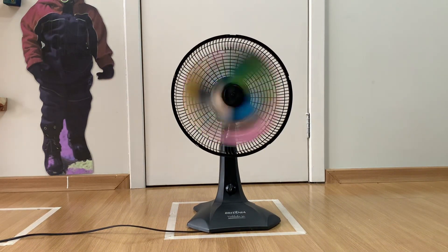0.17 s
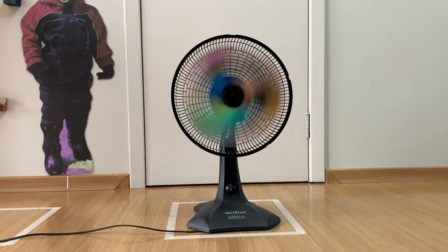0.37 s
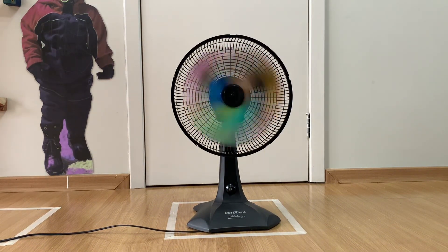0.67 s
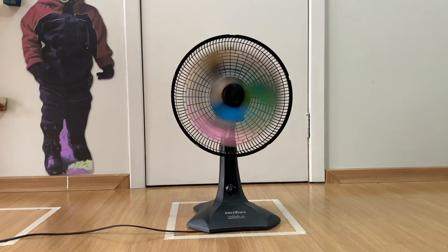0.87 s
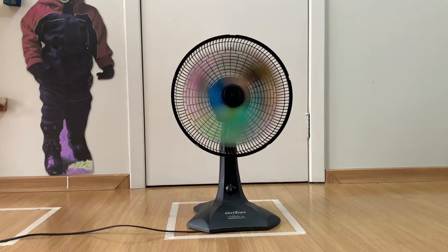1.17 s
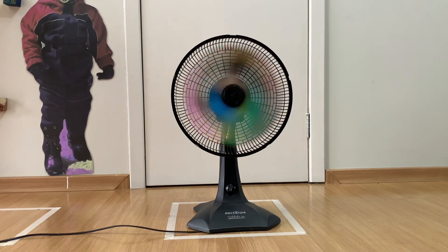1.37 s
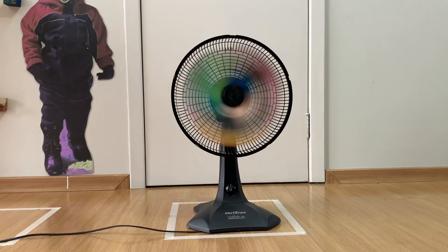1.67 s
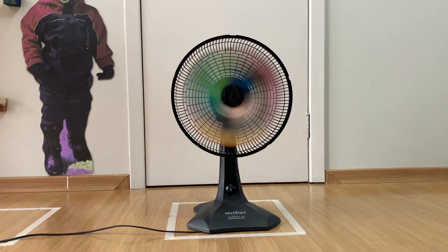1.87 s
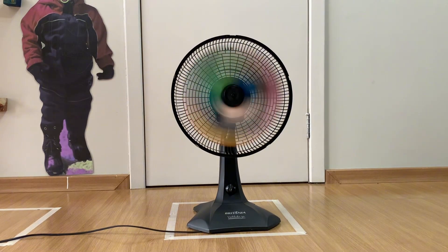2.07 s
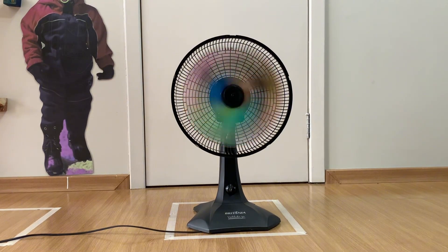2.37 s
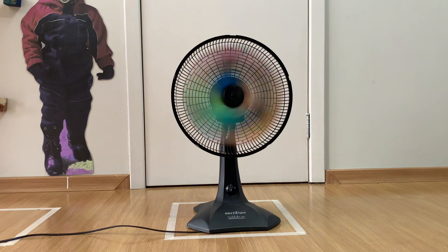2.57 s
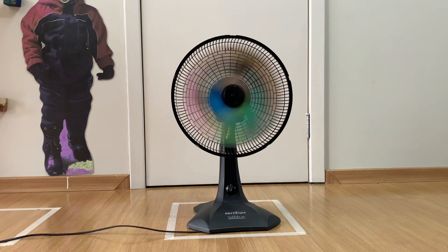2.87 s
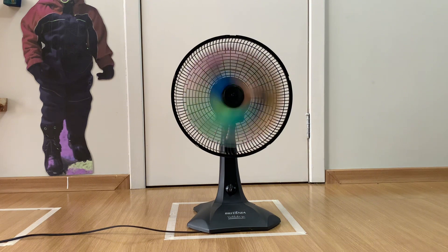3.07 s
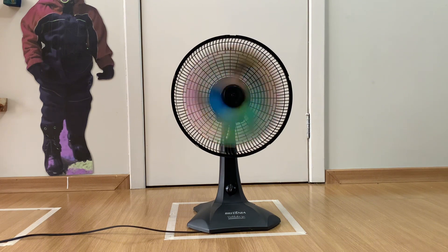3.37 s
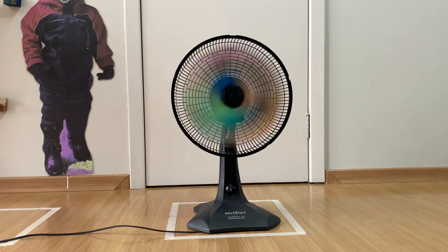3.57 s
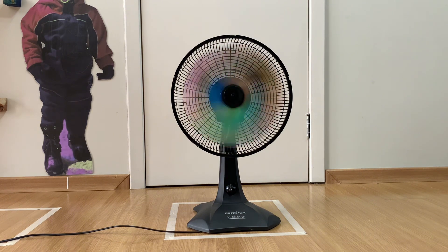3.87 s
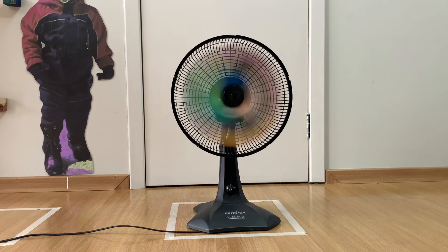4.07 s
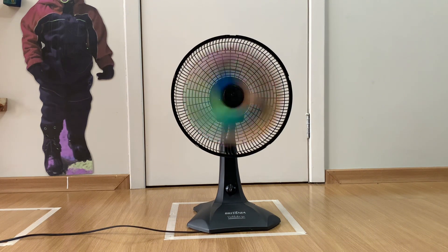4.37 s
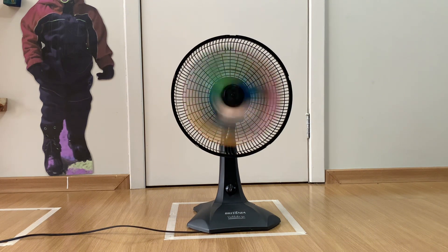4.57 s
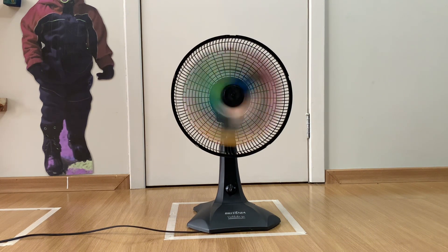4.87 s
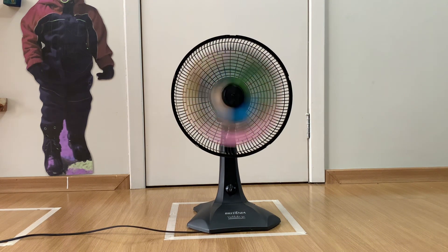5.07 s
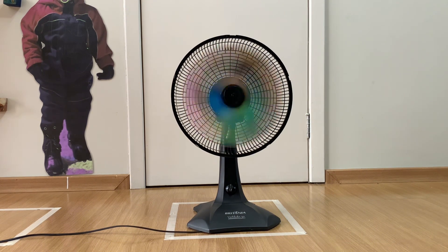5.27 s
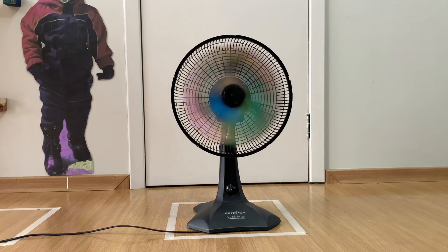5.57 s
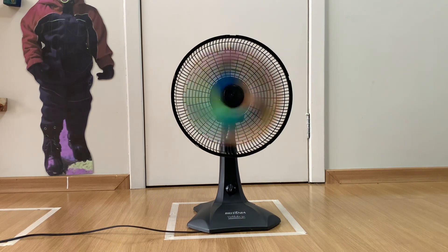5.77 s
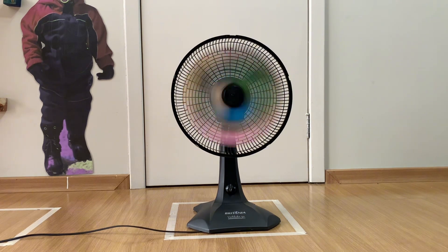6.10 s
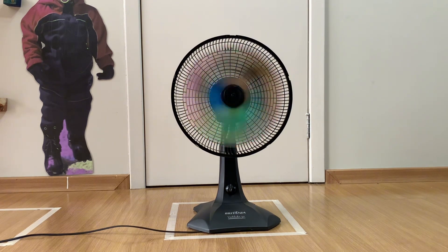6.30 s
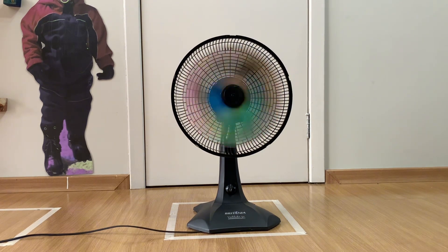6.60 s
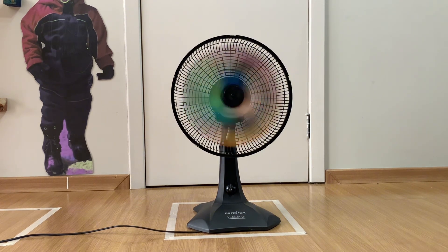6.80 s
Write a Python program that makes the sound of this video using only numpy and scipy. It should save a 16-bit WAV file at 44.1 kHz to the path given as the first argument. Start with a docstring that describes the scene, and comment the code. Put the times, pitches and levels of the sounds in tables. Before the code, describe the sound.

A desk fan whirs softly in a bare room, its draught buffeting the microphone with uneven low rumbling gusts and flapping thumps.

```python
"""Desk fan and draught in a bare room

A soft, slowly swelling rush of air through the grille is noise with a shaped spectrum, above a faint hum.
After a second the draught buffets the microphone: a low rumble of band-limited turbulence comes in gusts,
and single eddies, tones of falling pitch, flap across the ports and break up into rough flurries.
The quickest eddies tear with short rasps of noise; a steady room tone lies beneath."""
import sys
import numpy as np
from scipy import signal
from scipy.fft import rfft, irfft
from scipy.io import wavfile
from scipy.ndimage import uniform_filter1d, minimum_filter1d

SR = 44100
rng = np.random.default_rng(int(sys.argv[2]) if len(sys.argv) > 2 else 0)


def bounce(signal):
    """Save signal as a 16-bit WAV file at the path given by the first command-line argument."""
    frames = np.transpose(np.atleast_2d(signal))
    limited = np.clip(frames, -1, 1)
    pcm = np.round(limited * 32767).astype(np.int16)
    wavfile.write(sys.argv[1], SR, pcm)


N = 306054
TIME = np.arange(N) / SR

# relative strength of the plain draught on the microphone: t/s, level/dB
DRAUGHT_CURVE = [(0, -54.5), (.85, -48.5), (.94, -47), (1.01, -31), (1.65, -29), (2.3, -24), (3.4, -25),
                 (4.2, -26.5), (4.8, -23), (5.4, -24.5), (5.6, -32), (5.85, -29), (6.37, -25), (6.45, -30),
                 (6.62, -29), (6.92, -26)]
# strong eddies that hit the ports: t/s, relative ripple level/dB, pitch f/Hz, relative swing level/dB
STRONG_EDDIES = [(1.003, -27.5, 218.6, -41), (1.044, -33, 200.6, -15), (1.193, -30, 270.8, -18.5),
                 (1.225, -27, 281, -28), (1.383, -24.5, 235.5, -22), (1.453, -35, 234.3, -15.5),
                 (1.84, -32, 212, -19), (2.003, -23.5, 252.9, -14), (2.025, -23.5, 262, -29),
                 (2.208, -39, 194.3, -14.5), (2.292, -23, 289, -37), (2.311, -16.5, 350, -19),
                 (2.321, -15.5, 281.3, -14.5), (2.513, -23.5, 251.4, -19), (2.54, -33, 378.6, -26.5),
                 (2.602, -22, 330.6, -8.5), (2.665, -26, 252, -16.5), (2.778, -21, 300.4, -28.5),
                 (2.792, -21, 215.2, -7), (2.82, -18.5, 280, -15), (2.898, -19.5, 249, -25),
                 (3.094, -26.5, 367.6, -24), (3.204, -26, 255, -13), (3.267, -13.5, 272, -28),
                 (3.493, -17, 264, -14.5), (3.529, -22.5, 258.6, -20), (3.691, -21, 258, -18),
                 (3.847, -14, 275, -31.5), (3.854, -8.5, 487.4, -9), (3.893, -14, 294.3, -8),
                 (3.988, -21, 264.2, -14), (4.254, -20.5, 351.6, -13), (4.285, -23, 319, -22),
                 (4.331, -21, 262.8, -20), (4.39, -15, 237.6, -19), (4.598, -17, 289.4, -30),
                 (4.617, -20.5, 274, -16.5), (4.678, -12.5, 336.3, -7.5), (4.689, -11, 270.4, -15),
                 (4.705, -8.5, 224.6, -14.5), (4.727, -20, 278, -27), (4.996, -17.5, 279.3, -17.5),
                 (5.194, -13, 353, -14.5), (5.225, -18.5, 259, -17), (5.28, -11.5, 271.4, -14.5),
                 (5.34, -12.5, 328.8, -11.5), (5.711, -27, 258, -6.5), (5.807, -31, 281.2, -15.5),
                 (5.914, -22.5, 248.9, -12), (6.055, -21, 230.4, -5), (6.073, -16, 264.5, -20),
                 (6.085, -12.5, 264, -15.5), (6.173, -20, 261.6, -14.5), (6.223, -17.5, 276.5, -14.5),
                 (6.268, -13, 378.5, -11.5), (6.288, -5, 310.8, -6.5), (6.311, -17.5, 331.3, -13.5),
                 (6.331, -19, 285.6, -14.5), (6.386, -28.5, 330, -20.5), (6.564, -26, 238, -14.5),
                 (6.606, -16.5, 287.2, -12.5), (6.624, -14, 331, -12.5), (6.668, -15.5, 290, -23.5),
                 (6.68, -18.5, 259.6, -15), (6.735, -12.5, 298, -18.5), (6.754, -10.5, 250.3, -13),
                 (6.867, -11.5, 500.7, -18.5), (6.925, -20, 275, -9.5)]


def from_db(db):
    """Logarithmic level: decibels to amplitude gain."""
    return 10 ** (np.asarray(db) / 20)


def rms_one(x):
    """Normalisation by the root mean square, to an rms of 1."""
    return x / np.sqrt(np.mean(x ** 2) + 1e-20)


def in_time(rows):
    """Linear interpolation: each column of a curve at every sample."""
    s, *columns = np.transpose(rows)
    return [np.interp(TIME, s, column) for column in columns]


def butter(x, edges_hz, kind, order=2):
    """Causal Butterworth filter: maximally flat passband."""
    return signal.sosfilt(signal.butter(order, edges_hz, kind, fs=SR, output="sos"), x)


def coloured_noise(spectrum):
    """Spectral shaping: white noise is given a density in dB per Hz, interpolated over log frequency."""
    hz, level_db = np.transpose(spectrum)
    bins = np.maximum(np.fft.rfftfreq(N, 1 / SR), 1)
    gain = from_db(np.interp(np.log(bins), np.log(hz), level_db))
    return irfft(rfft(rng.standard_normal(N)) * gain, N) * np.sqrt(SR / 2)


def drift(rate):
    """Low-pass random process: chance of rms 1 that changes about rate times a second."""
    bins = np.fft.rfftfreq(N, 1 / SR)
    low_pass = 1 / (1 + (bins / rate) ** 2) ** 2
    return rms_one(irfft(rfft(rng.standard_normal(N)) * low_pass, N))


def wavering_tones(table):
    """Narrow-band noise: two random quadrature amplitudes make a line waver in strength and phase."""
    out = np.zeros(N)
    for hz, level_db, width_hz in table:
        phase = 2 * np.pi * hz * TIME
        line = drift(width_hz) * np.cos(phase) + drift(width_hz) * np.sin(phase)
        out += from_db(level_db) * line
    return out


def around(s):
    """Finite support: the samples computed for an eddy or tear at time s."""
    return slice(max(int((s - .03) * SR), 0), int((s + .07) * SR))


def fan(air_db=-83.5):
    """Broadband flow noise and grille whistles follow the rush; the hum of motor and blades is steady."""
    # colour of the rush, common to both channels (mid): f/Hz, relative density level/dB per Hz
    rush_mid = [(150, -0.5), (400, 2.5), (600, -3.5), (780, 1), (950, -4), (1090, -9), (1260, 2.5),
                (1550, -0.2), (1830, -2.4), (2040, -9.5), (3050, -10.5), (3500, -18), (5000, -22),
                (7000, -29), (9000, -47.5), (14000, -30)]
    # colour of the rush, opposed between the channels (side): f/Hz, relative density level/dB per Hz
    rush_side = [(150, -3.5), (450, -19), (720, -18), (890, -13), (1060, 2.5), (1350, -6.5), (1750, -8),
                 (2150, -15), (3000, -13), (3800, -23.5), (5200, -22), (7000, -28.5), (10000, -38),
                 (14000, -35)]
    # faint whistles of the grille: f/Hz, level relative to the rush gain/dB, width/Hz
    whistles = [(1288, -67, 12), (1723, -70, 11), (1789, -76, 25), (2602, -80, 22)]
    # hum of motor and blades, in mid before the flicker: f/Hz, level/dB, width/Hz
    hum_lines = [(69.8, -54.5, 13), (121.2, -54.5, 29), (193.6, -66, 61), (433, -75.5, 170)]
    air = from_db(air_db) * np.array([room(coloured_noise(rush_mid)), room(coloured_noise(rush_side))])
    grille = np.array([wavering_tones(whistles), wavering_tones(whistles) / 2])
    hum = np.array([wavering_tones(hum_lines), wavering_tones(hum_lines) / 2])
    return rush_strength() * (air + grille) + hum


def rush_strength(wander_db=0.6, dip_edge_s=0.025):
    """Amplitude modulation: the rush swells quickly, then settles and wavers, with two brief dips."""
    # gain of the rush before wander and dips: t/s, level/dB
    rush_curve = [(0, -15.5), (.6, -9.5), (1.05, -6.5), (2.05, -6), (2.7, -2.5), (3.9, 0.1), (5.2, .5),
                  (6.94, 1.9)]
    # brief dips that begin to recover: start t/s, end t/s, first depth/dB, last depth/dB
    rush_dips = [(4.638, 4.827, 6, 2), (5.178, 5.696, 5, 4)]
    level_db = in_time(rush_curve)[0] + wander_db * drift(6)
    for start, end, first_db, last_db in rush_dips:
        depth_db = np.interp(TIME, [start, end], [first_db, last_db])
        inside_s = np.minimum(TIME - start, end - TIME)
        level_db = level_db - depth_db * np.clip(.5 + inside_s / dip_edge_s, 0, 1)
    return from_db(level_db)


def room(x, count=24, reflection_db=-20, t60_s=.35):
    """Comb interference: echoes of bare floor, door and walls ripple the spectrum; the power is kept."""
    delays_s = rng.uniform(0.0029, .06, count)
    signs = rng.choice([-1, 1], count)
    gains = signs * from_db(reflection_db - 60 * delays_s / t60_s)
    echoes = sum(gain * np.roll(x, int(delay * SR)) for gain, delay in zip(gains, delays_s))
    return (x + echoes) / np.sqrt(1 + np.sum(gains ** 2))


def room_tone():
    """Stationary noise: room tone and hiss, independent in mid and side."""
    # spectrum of the room tone before the flicker: f/Hz, density level/dB per Hz
    tone_spectrum = [(25, -104), (100, -71), (280, -88), (420, -90), (700, -99), (1100, -91.5), (1500, -97),
                     (2200, -108), (5500, -109), (8000, -115), (11000, -114), (14000, -124)]
    return np.array([coloured_noise(tone_spectrum), coloured_noise(tone_spectrum)])


def flicker(x, spread_db=2.7):
    """Short-time spectral modulation: the sound flickers in small patches of time and frequency."""
    spectra = signal.stft(x, nperseg=1024)[2]
    patches = uniform_filter1d(rng.standard_normal(spectra.shape), size=3, axis=-2)  # along frequency
    patches = uniform_filter1d(patches, size=5, axis=-1)  # along time
    flickering = spectra * from_db(spread_db * rms_one(patches))
    return signal.istft(flickering, nperseg=1024)[1][..., :N]


def lull_depth(lull_s=0.035):
    """Smooth sech-squared pulses: how far the draught has sunk, in dB."""
    # lulls in the draught: t/s, depth/dB (negative where it rises)
    lulls = [(1.14, 2), (1.33, 0), (1.65, 2.5), (2.09, 9.5), (2.469, 6.5), (2.72, 2.5), (3.129, 4),
             (3.45, 5), (4.11, 3), (4.191, -0.5), (5.68, 0), (5.78, -5.5), (6.15, -0.5), (6.498, 3.5),
             (6.822, 6.5)]
    depth = np.zeros(N)
    for s, depth_db in lulls:
        distance = np.minimum(np.abs(TIME - s) / lull_s, 10)
        depth += depth_db / np.cosh(distance) ** 2
    return depth


def wind_levels(steepness=4.33):
    """Addition of powers: gusts add bells to the draught; deep dB, flutter dB, plain draught's share."""
    # gusts: t/s, length/s, relative deep rumble level/dB, relative flutter level/dB
    gusts = [(0.128, 0.057, -44, -39.5), (0.208, 0.039, -43, -44), (0.492, 0.031, -38, -60),
             (.61, .04, -43, -50), (1.075, 0.048, -22, -33), (1.231, 0.027, -20.5, -40),
             (1.483, 0.024, -16, -38), (1.562, 0.043, -14.5, -33), (1.74, 0.056, -15.5, -25.5),
             (1.847, 0.031, -17, -23), (2.003, 0.034, -17.5, -23.5), (2.148, 0.041, -22.5, -30),
             (2.515, 0.033, -21, -26), (2.625, 0.046, -17.5, -30), (2.805, 0.03, -7, -13.5),
             (2.959, 0.031, -16, -42), (3.211, 0.07, -19, -18.5), (3.547, 0.11, -20.5, -29.5),
             (3.734, 0.025, -21.5, -23.5), (3.807, 0.019, -19.5, -32), (3.925, 0.029, -18, -29),
             (4.012, 0.048, -12.5, -32.5), (4.568, 0.036, -13, -23), (4.647, 0.039, -13.5, -28),
             (4.699, 0.037, -11.5, -8.5), (4.786, .06, -25, -20), (4.886, .05, -25.5, -26),
             (4.959, 0.061, -17, -25.5), (5.015, 0.016, -8, -31), (5.142, 0.048, -16.5, -27.5),
             (5.295, 0.034, -11, -26.5), (5.443, 0.028, -16, -35), (5.516, 0.034, -20, -31.5),
             (6.006, 0.032, -17, -19.5), (6.077, 0.045, -18.5, -15), (6.221, 0.031, -16.5, -27),
             (6.297, 0.066, -13.5, -19), (6.395, 0.019, -18.5, -32), (6.619, 0.073, -16.5, -22.5),
             (6.751, 0.022, -10.5, -16)]
    gust_deep_db, gust_flutter_db = -1.5, -2.5  # added to the table's levels
    flutter_under_db = 11  # small whirls against large ones, between gusts
    flutter_lull_growth = 1.9  # the small whirls die away further in a lull
    draught_db, = in_time(DRAUGHT_CURVE)
    lull_db = lull_depth()
    plain = from_db(draught_db - lull_db)
    deep = plain ** 2
    flutter = from_db(draught_db - flutter_under_db - flutter_lull_growth * lull_db) ** 2
    for s, length_s, deep_db, flutter_db in gusts:
        near = np.abs(TIME - s) < 2 * length_s
        bell = np.exp(-steepness * ((TIME[near] - s) / length_s) ** 2)
        deep[near] += bell * from_db(deep_db + gust_deep_db) ** 2
        flutter[near] += bell * from_db(flutter_db + gust_flutter_db) ** 2
    return 10 * np.log10(deep), 10 * np.log10(flutter), plain / np.sqrt(deep)


def churn(low_hz, high_hz, even_s):
    """Band-limited turbulence, its short-time power made even over spans longer than even_s."""
    band = butter(rng.standard_normal(N + SR), [low_hz, high_hz], "band", order=3)[SR:]  # settled filter
    size = max(int(even_s * SR), 2)
    power = uniform_filter1d(uniform_filter1d(band ** 2, size), size)
    return band / np.sqrt(power + 1e-12)


def rumble():
    """Turbulent pressure on a port: between gusts it breaks into lumps, in each band by its own depth."""
    # wind in bands: low f/Hz, high f/Hz, share of the flutter curve/0-1, relative level/dB, lumpiness/dB
    wind_bands = [(45, 77.9, 0, 2, 3.5), (64.5, 113.4, 0.04, -6, 4), (121, 203.6, 0.95, -4, 4),
                  (192, 310, 1, -16.5, 6.5), (300, 550, 1, -37, 5)]
    deep_db, flutter_db, calm = wind_levels()
    lumps = calm * drift(36)
    out = np.zeros(N)
    for low_hz, high_hz, share, level_db, lumpy_db in wind_bands:
        drive_db = deep_db + share * (flutter_db - deep_db)
        out += from_db(drive_db + level_db + lumpy_db * lumps) * churn(low_hz, high_hz, even_s=0.03)
    return butter(out, 17, "high")


def small_eddies(per_s=9, ripple_db=-3, spread_db=2, centre_hz=190.03, swing_db=8):
    """Random arrivals, one per equal interval, as strong as the draught allows; rows as STRONG_EDDIES."""
    count = int(per_s * N / SR)
    when, strength, pitch = rng.random((count, 3)).T
    s = (np.arange(count) + when) / count * N / SR
    draught_db, = in_time(DRAUGHT_CURVE)
    peak_db = np.interp(s, TIME, draught_db - lull_depth()) + ripple_db
    peak_db = peak_db + spread_db * (2 * strength - 1)
    hz = centre_hz * 2 ** ((pitch - .5) / 2)
    return list(zip(s, peak_db, hz, peak_db + swing_db))


def eddies(glide_cycles=1.8, end_hz=62, level_db=-2.5, swing_level_db=-1.0, ragged=0.128, lead_cycles=1.5):
    """Frequency modulation: a quick small ripple slows into a big swing, a short, ragged, falling flap."""
    ripple_s, swing_s = 0.00095, 0.01  # swell of the ripple; time from it to the top of the swing
    out = np.zeros(N)
    wobble = np.exp(ragged * drift(417))
    rows = list(STRONG_EDDIES) + small_eddies()
    start_cycles = rng.random(len(rows))
    for (s, ripple_db, hz, swing_db), start in zip(rows, start_cycles):
        near = around(s)
        age = TIME[near] - s
        glide = np.exp(np.minimum(-age * hz, lead_cycles) / glide_cycles)
        pitch_hz = wobble[near] * (end_hz + (hz - end_hz) * glide)
        ripple = from_db(ripple_db + level_db) / np.cosh(age / np.where(age < 0, ripple_s, 2 / hz))
        grown = np.maximum(age, 0) / swing_s
        swing = from_db(swing_db + swing_level_db) * (grown * np.exp(1 - grown)) ** 2  # top at grown = 1
        phase = 2 * np.pi * (start + np.cumsum(pitch_hz) / SR)
        out[near] += np.hypot(ripple, swing) * np.sin(phase)
    return out


def wakes(level_db=-22.0, growth=1.49, rise_s=0.0035, fall_s=0.012, low_hz=200, high_hz=470):
    """Turbulent breakdown: strong eddies become a rough flurry of whirls, more so the heavier the eddy."""
    out = np.zeros(N)
    for s, ripple_db, _, swing_db in STRONG_EDDIES:
        near = around(s)
        age = TIME[near] - s
        whirls = rms_one(butter(rng.standard_normal(len(age)), [low_hz, high_hz], "band", order=3))
        weight_db = (ripple_db + swing_db) / 2
        shape = 1 / np.cosh(age / np.where(age < 0, rise_s, fall_s))
        out[near] += from_db(level_db + growth * weight_db) * whirls * shape
    return out


def narrow_bass(side, start_s=1.418, fade_s=0.026, edge_hz=620):
    """Mid-side stereo: with the wind set in, high-passing the side draws the bass into the centre."""
    centred = np.clip((TIME - start_s) / fade_s, 0, 1)
    return (1 - centred) * side + centred * butter(side, edge_hz, "high", order=10)


def tearing(spread=1.32, rise_s=0.00063):
    """Transient band noise: a rasp just under an octave wide starts sharply and tapers off."""
    # the quickest eddies tear at the rim of the port: t/s, level/dB, centre f/Hz, length/s
    tears = [(2.312, -39.5, 537, 0.0079), (2.601, -41, 537, 0.0025), (2.824, -45, 544, .003),
             (3.843, -45, 1520, .004), (3.851, -35.5, 1350, .0025), (3.863, -43, 1350, .004),
             (3.891, -35.5, 480, 0.0023), (4.252, -46, 520, .003), (4.678, -36.5, 655, 0.0035),
             (4.713, -40, 470, 0.0054), (5.279, -37.5, 463, .006), (6.266, -32.5, 628, 0.0037),
             (6.289, -34.5, 520, .004), (6.33, -40, 480, .003), (6.604, -42.5, 530, .004),
             (6.625, -35.5, 540, 0.0032), (6.67, -42, 540, .003), (6.738, -43, 580, .003),
             (6.756, -39.5, 520, 0.0027), (6.869, -34.5, 800, 0.0012)]
    out = np.zeros(N)
    for s, level_db, hz, length_s in tears:
        near = around(s)
        age = TIME[near] - s
        shape = 1 / np.cosh(age / np.where(age < 0, rise_s, length_s))
        noise = butter(rng.standard_normal(len(age)), [hz / spread, hz * spread], "band", order=5)
        rasp = rms_one(shape * noise)
        out[near] += from_db(level_db) * rasp * np.sqrt(np.mean(shape ** 2))
    return out


def scene(eddy_side_db=-11):
    """Superposition: fan, room tone and wind on the ports add in mid and side, then left and right."""
    air_mid, air_side = flicker(fan() + room_tone())
    mid = air_mid + rumble() + eddies() + wakes() + tearing()
    # fresh draws make the wind differ between the two ports
    side = narrow_bass(air_side + rumble() / 2 + from_db(eddy_side_db) * eddies())
    return np.array([mid + side, mid - side])


def record(dry, ceiling=.95, cutoff_hz=14000):
    """Gain reduction: a smooth limiter holds the biggest buffets under full scale; the top is cut."""
    allowed = ceiling / np.maximum(np.abs(dry).max(axis=0), ceiling)
    held = minimum_filter1d(allowed, size=801)
    gain = uniform_filter1d(uniform_filter1d(held, size=401), size=401)
    top_cut = signal.cheby2(12, 70, cutoff_hz, fs=SR, output="sos")  # 70 dB down from the cutoff upward
    return signal.sosfilt(top_cut, gain * dry)


dry = scene()
out = record(dry)
bounce(out)
```